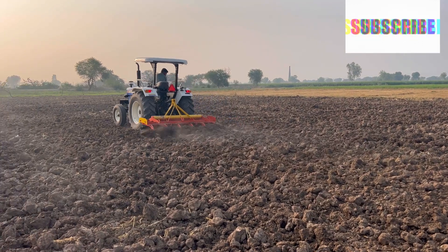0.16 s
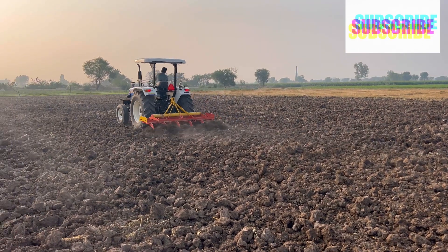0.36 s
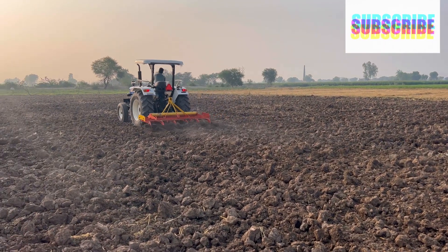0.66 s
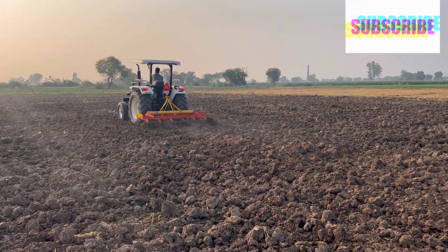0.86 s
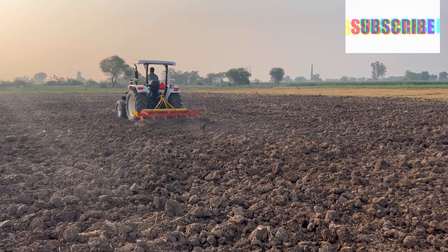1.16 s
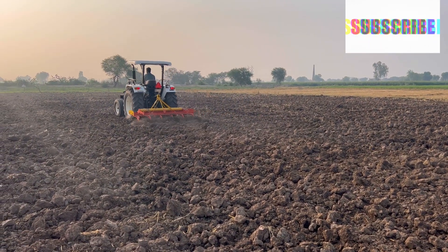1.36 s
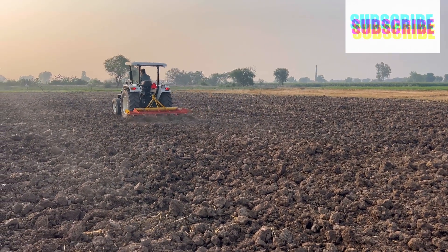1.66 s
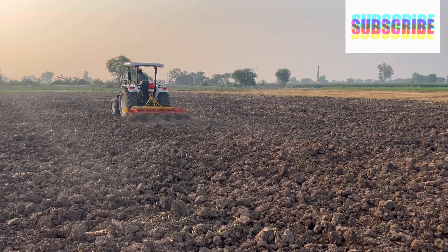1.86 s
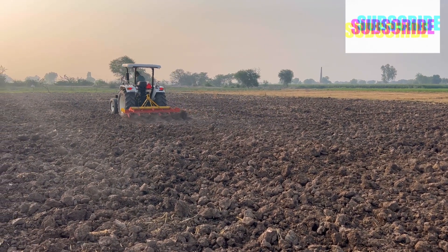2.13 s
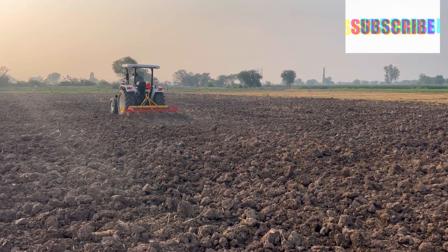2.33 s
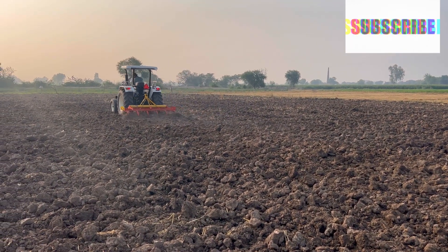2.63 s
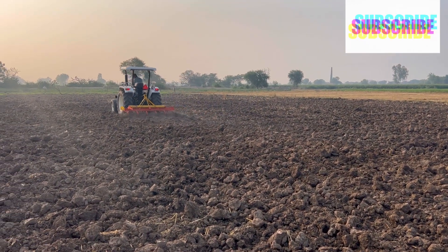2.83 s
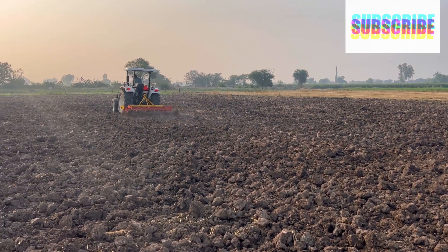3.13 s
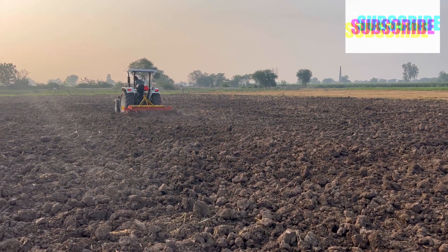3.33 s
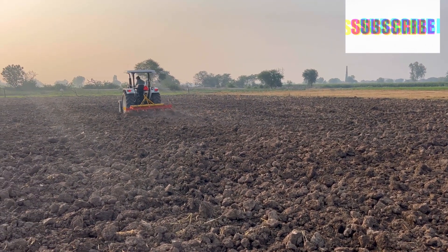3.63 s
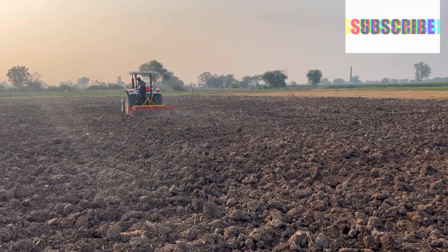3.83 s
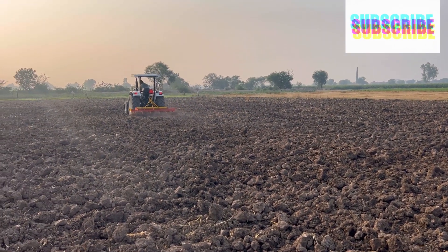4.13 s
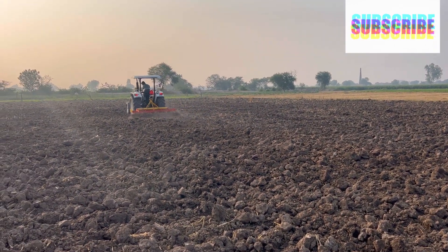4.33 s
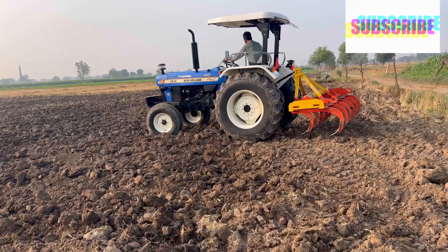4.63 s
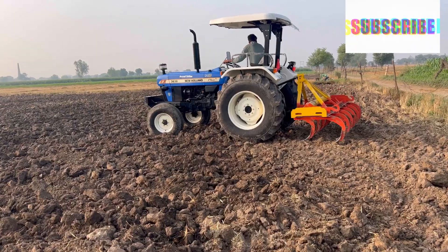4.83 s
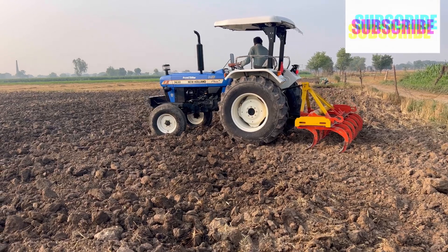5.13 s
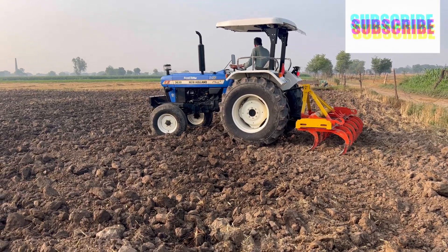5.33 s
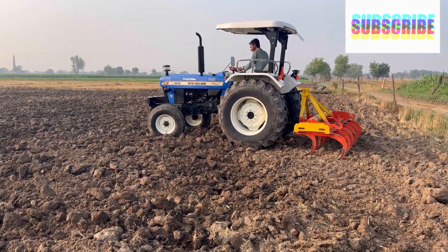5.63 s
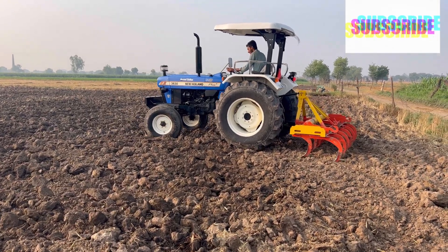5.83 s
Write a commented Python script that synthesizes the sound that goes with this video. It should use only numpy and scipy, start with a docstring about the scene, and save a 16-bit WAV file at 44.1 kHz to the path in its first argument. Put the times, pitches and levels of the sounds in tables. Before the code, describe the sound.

Far-off tractor engine hums and rattles over a ploughed field, slowly fading, before a sudden cut to a near, fast-beating diesel that bogs down.

```python
"""A three-cylinder diesel tractor drags a harrow over an open ploughed field: far off and driving away,
then from close by as the load pulls its speed down. Sine orders of the firing rate make its exhaust and
whine; shaped noise, pulsed by the firings, makes the roar of the block and the clatter of tines.
Tines strike stones as decaying rings and grit; gliding tones make a linkage squeak and a bird chirp;
low noise buffets as wind. Two microphone ports hear it all."""
import sys
import numpy as np
from scipy import signal
from scipy.fft import rfft, irfft, next_fast_len
from scipy.io import wavfile
from scipy.ndimage import uniform_filter1d

SR = 44100
rng = np.random.default_rng(int(sys.argv[2]) if len(sys.argv) > 2 else 0)


def to_wav(sig):
    """Store sig (one row per channel, or 1-D mono) as 16-bit WAV at the path in sys.argv[1].

    Samples outside -1..1 are clipped; the rate is SR.
    """
    pcm = np.clip(np.atleast_2d(sig), -1, 1) * 32767
    pcm = np.round(pcm).astype(np.int16)
    wavfile.write(sys.argv[1], SR, pcm.T)  # frames by channels


N = 263718

# the two microphone ports, as they hear the far tractor and the bird:
# (frequency [Hz], left over right [dB], likeness [0-1], left leads [rad])
FAR_PORTS = [(38, 2, 0.8, 0.02), (75, 0, 0.93, 0.065), (190, -0.5, 0.99, 0.091), (300, 1.5, 1, 0.18),
             (506, 0, 0.96, 0.56), (1280, 7, 0.84, 0.99), (1414, -2, 0.4, 2.1), (1694, 15.5, 1, 1.63),
             (2210, -15, 0.32, 2.4), (2500, 4, 0.83, 1.9), (2840, 1, 0.73, 0.89), (3670, -4, 0.81, 3),
             (4650, -2, 0.84, 1.96), (5020, 4.5, 0.22, 5.3), (5760, 6.5, 1, 3.8), (7400, 7.5, 0.2, 6),
             (9400, 11.5, 0.6, 2.5)]
FLYWHEEL_S = 0.087  # speed changes are rounded over this time


def far_tractor(t):
    """Steady low exhaust orders and a whine over a thin roar, sinking as it drives away."""
    # engine speed as the tines bite and let go: (time [s], firing rate [firings per s])
    run = [(0.0, 37.7), (0.12, 37.5), (0.3, 35.7), (0.6, 38.0), (0.7, 37.3), (0.86, 37.3), (1.02, 36.5),
           (1.2, 38.0), (1.67, 38.3), (1.93, 35.9), (2.14, 37.0), (2.36, 35.9), (2.62, 37.3), (2.81, 39.85),
           (2.95, 39.75), (3.1, 38.1), (3.2, 40.3), (3.31, 40.5), (3.48, 35.0), (3.71, 36.7), (3.98, 37.85),
           (4.2, 38.0), (4.42, 36.4)]
    # (multiple of the firing rate, level against the exhaust [dB], wander [dB], extra fade [dB per s])
    orders = [(1, -11, .7, 0), (2, 1, .5, 0), (3, -11, 1, .3), (4, -18, 1, 2), (5, -24.5, 1, 0),
              (6, -29, 2, .5), (7, -22, 1, .3), (8, -28, 1.5, 0), (9, -18.5, 2, 1), (10, -24.5, 1.5, 0),
              (11, -23, 1.5, 1), (12, -23, 1, 0), (15, -26, 1.5, .5), (27, -30, 2.5, 0), (28, -26, 3, 0),
              (29, -27, 3, 0), (30, -28, 3, 0)]
    # the whine comes and goes: (time [s], level before resonance and wander [dB])
    whine = [(0, -39.5), (.25, -41), (.33, -48), (.6, -48), (.68, -40), (.8, -41), (.88, -50), (1.15, -47),
             (1.25, -41), (1.7, -41), (1.8, -48), (1.95, -40.5), (2.05, -40), (2.13, -53), (2.26, -52),
             (2.33, -43), (2.58, -43), (2.66, -56), (2.79, -41), (2.94, -40), (3, -58), (3.15, -56),
             (3.21, -45.5), (3.3, -46), (3.35, -56), (3.45, -43), (3.6, -43), (3.75, -47), (4, -43),
             (4.27, -43), (4.36, -52)]
    # colour of the roar, engine block then tines: (frequency [Hz], relative density [dB per Hz])
    block = [(24, -40), (31, -29.5), (44, -20), (60, -25.5), (85, -15), (100, -18.5), (130, -20),
             (170, -19), (300, -8.5), (506, -8), (560, -10), (610, -18), (670, -19.5), (1073, -8),
             (1800, -21)]
    clatter = [(1900, -26), (2400, -17), (3100, -22), (3700, -20.5), (4000, -27), (6200, -31), (6500, -36),
               (8300, -39.5), (9400, -49.5), (11600, -47), (13900, -44.5), (15100, -58), (15200, -91)]
    # echoes dent and lift the treble: (centre [Hz], width [Hz], left change [dB], right change [dB])
    echoes = [(1546, 66, 4.5, 0), (1760, 83, 1, 10.5), (3250, 200, -10.5, -0.5), (4260, 250, 4, -1.5),
              (4740, 190, -5, 2), (5360, 150, 0, -2), (5516, 170, 1.5, 2.5), (6630, 180, -5.5, 1),
              (6900, 200, 2, -2), (7606, 270, -3.5, -9.5), (8460, 250, 0, 8)]
    # bands that swell or sink as the tractor turns its side:
    # (centre [Hz], width [Hz], change from middle to end [dB])
    turning = [(1500, 250, 3.5), (2200, 300, -1.5), (3600, 400, 1)]
    governor_s = 0.057  # fuel answers a speed change late
    exhaust_db, exhaust_fade_db_per_s = -25.5, 1.0  # level at the start
    roar_db, roar_fade_db_per_s = -30, 1.71  # level at the start
    load_db_per_hz = 0.1  # the exhaust barks louder when the speed has sagged
    # weakening of upper orders while the speed glides, scaled by order / 14; the whine is left out
    smear_db_per_hz_s = 0.06

    firing_hz = uniform_filter1d(play(run, t)[0], round(FLYWHEEL_S * SR))
    turns = np.cumsum(firing_hz) / SR  # one turn is one firing
    sag_hz = firing_hz[0] - np.interp(t - governor_s, t, firing_hz)
    db = exhaust_db - exhaust_fade_db_per_s * t + load_db_per_hz * sag_hz + .5 * drift(t, 8)

    # the fourteenth order whines and swells at the pipe resonance
    whine_hz, below_hz = 14 * firing_hz, 13 * firing_hz
    whine_db = play(whine, t)[0] + 1.6 * drift(t, 25)
    pipe_db = resonance(whine_hz, centre_hz=561, width_hz=16, lift_db=7)
    out = tone(14 * turns, whine_hz, whine_db + pipe_db, FAR_PORTS)
    # the order below is weaker and joins near a lower resonance
    below_db = -11 + resonance(below_hz, centre_hz=496, width_hz=12, lift_db=9.5)
    out = out + tone(13 * turns, below_hz, whine_db + below_db + drift(t, 8), FAR_PORTS)

    glide_hz_per_s = uniform_filter1d(np.gradient(firing_hz, t), round(FLYWHEEL_S * SR))
    for k, level_db, wander_db, fade_db_per_s in orders:
        k = round(k)
        # the lowest order swings against the next two
        phase_turns = .5 * (k == 1) if k < 4 else rng.random()
        smear_db = k / 14 * smear_db_per_hz_s * abs(glide_hz_per_s) * (k > 4)
        order_db = db + level_db - fade_db_per_s * t + wander_db * drift(t, 9) - smear_db
        out = out + tone(k * turns + phase_turns, k * firing_hz, order_db, FAR_PORTS)

    noise = roar(t, turns, block + clatter, FAR_PORTS, echoes, turning, stretch=0.049,
                 low_mid_rise_db=0.5, sway=0.15, patchy_db=1.0, throb_db=2.0, rattle_db=5.5, count=2)
    return out + amp(roar_db - roar_fade_db_per_s * t) * noise


def near_tractor(t):
    """Sharp exhaust beats, cylinder orders and body rings over a loud roar, as load drags the speed."""
    # (time [s], firing rate [firings per s])
    run = [(4.42, 63.7), (5.1, 63.42), (5.38, 63.3), (5.57, 62.9), (5.66, 61.5), (5.76, 59.7), (5.98, 51.5)]
    # the first three firing orders: (level running free [dB], change under full load [dB], wander [dB])
    exhaust = [(-25.5, 7, .8), (-29, 8, 1.2), (-26, -9, .8)]
    # weaker orders; thirds are the unevenness between cylinders:
    # (thirds of the firing rate, level before sag and resonance [dB])
    orders = [(4, -39), (8, -38), (10, -44), (11, -39.5), (12, -42), (13, -43), (14, -44), (15, -43),
              (18, -38), (20, -47), (21, -37), (22, -47), (25, -49), (27, -43), (30, -50), (32, -48),
              (33, -43), (34, -43), (36, -45), (38, -47), (39, -43.5), (40, -37.5), (42, -36.5), (44, -48),
              (46, -45), (47, -48), (48, -37.5), (49, -45), (51, -48), (52, -48), (53, -42), (54, -38.5),
              (56, -49), (57, -49)]
    # body resonances that stay put while the speed sags: (frequency [Hz], width [Hz], level before sag [dB])
    body = [(724, 14, -41), (1720, 6, -44.5), (1970, 10, -47), (2578, 6, -45)]
    # colour of the roar, engine block then tines: (frequency [Hz], relative density [dB per Hz])
    block = [(25, -28.5), (27, -17), (62, -12), (150, -8), (219, -8), (306, -4), (428, -7), (506, -14.5),
             (550, -8.5), (650, -14), (720, -7), (780, -8.5), (870, -10.5), (1167, -9), (1269, -15.5),
             (1600, -14), (1800, -14.5)]
    clatter = [(1900, -12), (2200, -19), (2600, -11.5), (3200, -17.5), (4700, -16), (5300, -20),
               (5600, -21), (7100, -28), (7900, -28.5), (8100, -25.5), (9000, -31), (11800, -30.5),
               (15000, -33), (15400, -29.5)]
    # the ports close by: (frequency [Hz], left over right [dB], likeness [0-1], left leads [rad])
    ports = [(60, -0.5, 1, -0.02), (120, 0, 1, -0.38), (190, 0, 1, 0), (303, -0.8, 1, 0.0),
             (403, -2.5, 0.95, 0.5), (502, -4, 0.9, 0.2), (635, 11, 0.1, 3), (705.5, 1, 1, -0.5),
             (1100, 3.5, 1, 1.18), (1300, -2, 0, -2.5), (1410, 7, 0, 3), (1524, 5, 1, 4),
             (3816, -5, 0.6, 8.5), (7000, 10.5, 0.12, 9.5), (7200, 7, 0.32, 10.5), (8400, 2, 0.4, 14),
             (8600, 9, 0, 24), (9500, -4, 0.16, 12)]
    # echoes dent and lift the treble: (centre [Hz], width [Hz], left change [dB], right change [dB])
    echoes = [(1540, 150, 0, -1.5), (3006, 230, 0, 1.5), (3210, 140, -2, -4.5), (3730, 135, 7, 2),
              (4100, 180, -6, -4.5), (5340, 168, -12, -1), (6470, 330, -1, 3.5), (7200, 180, -2, -6),
              (9000, 150, -4, -1)]
    # bands that swell or sink as the tractor turns its side:
    # (centre [Hz], width [Hz], change from middle to end [dB])
    turning = [(1500, 300, 3), (2070, 150, -2.5), (3750, 250, -1.5)]
    full_load_sag_hz = 4.5
    load_lag_turns = .39  # under load each order lags the one below, so the beats round off
    roar_db, roar_sag_db_per_hz = -23.5, 0.15

    firing_hz = uniform_filter1d(play(run, t)[0], round(FLYWHEEL_S * SR))
    turns = np.cumsum(firing_hz) / SR
    sag_hz = firing_hz[0] - firing_hz
    load = np.tanh((sag_hz / full_load_sag_hz) ** 2)

    out = 0
    for k, (free_db, load_db, wander_db) in enumerate(exhaust, 1):
        lag_turns = (k - 1) * load_lag_turns * load
        order_db = free_db + load_db * load + wander_db * drift(t, 14)
        out = out + tone(k * turns - lag_turns, k * firing_hz, order_db, ports)

    sag_db = -0.4 * sag_hz  # weaker orders sink further as the speed falls
    for thirds, level_db in orders:
        order_hz = thirds / 3 * firing_hz
        # a panel resonance lifts whichever order passes it
        hood_db = resonance(order_hz, centre_hz=298, width_hz=11, lift_db=12 - sag_db)
        order_db = level_db + sag_db + hood_db + 1.4 * drift(t, 9.1)
        out = out + tone(thirds / 3 * turns + rng.random(), order_hz, order_db, ports)

    for hz, width_hz, level_db in body:  # a narrow ring: pitch and level both waver
        ring_turns = np.cumsum(hz + width_hz / 2 * drift(t, 14)) / SR
        ring_db = level_db - 3 * abs(sag_hz / 7) ** 3 + 1.8 * drift(t, 8)
        out = out + tone(ring_turns, hz, ring_db, ports)

    noise = roar(t, turns, block + clatter, ports, echoes, turning, stretch=0.0021,
                 low_mid_rise_db=2.5, sway=0.45, patchy_db=1.3, throb_db=1.0, rattle_db=1.0, count=1)
    return out + amp(roar_db - roar_sag_db_per_hz * sag_hz) * noise


def roar(t, turns, colour, ports, echoes, turning, stretch, low_mid_rise_db, sway, patchy_db,
         throb_db, rattle_db, count):
    """Noise of block and tines, puffed by each firing, the treble broken into rattles."""
    # top treble: left and right opposed, then alike: (frequency [Hz], signed likeness [-1 to 1])
    top_likeness = [(9400, -.6), (9900, -1), (10900, -1), (11400, -.75), (12300, .7), (12650, 1),
                    (14300, 1), (14800, .3), (15400, -.8)]
    frames, hz = len(t) // 512 + 5, np.fft.rfftfreq(2048, 1 / SR)[:, None]
    a, b, c, d, patches, air = rng.standard_normal((frames, 1025, 6), dtype=np.float32).T
    travel = np.linspace(-1, 1, frames)
    below_top = hz < top_likeness[0][0]

    # ground echo and port colour slide upward as the bearing changes
    seen_hz = hz / (1 + stretch * travel * np.clip(hz / 1500 - .5, 0, 1) * below_top)
    over_db, like, lead = read(ports, seen_hz)
    air = evened(uniform_filter1d(uniform_filter1d(air, 20, 0), 30, 1))
    lead = lead + sway * air * np.clip(hz / 2000, 0, 1)  # moving air shifts the path to each port
    same_below = np.clip(like, 0, .999) ** 0.82 * np.exp(-1j * lead)
    same = np.where(below_top, same_below, read(top_likeness, seen_hz)[0])

    half_db = over_db * below_top / 2
    sides_db = np.array([half_db, -half_db])
    for centre_hz, width_hz, *change_db in echoes:
        dent = np.exp(-((seen_hz - centre_hz) / width_hz) ** 2)
        sides_db = sides_db + np.reshape(change_db, (2, 1, 1)) * dent
    for centre_hz, width_hz, change_db in turning:
        sides_db = sides_db + travel * resonance(hz, centre_hz, width_hz, change_db)

    # the right side shares part of the left side's noise
    left = a + 1j * b
    right = same * left + np.sqrt(1 - abs(same) ** 2) * (c + 1j * d)
    spectrum = np.array([left, right])
    patches = evened(uniform_filter1d(uniform_filter1d(patches, 20, 0), 6, 1))
    # the low mids around 220 Hz climb steadily
    low_mid_db = low_mid_rise_db * travel * np.exp(-np.log(hz / 220 + 1e-9) ** 2)
    spectrum *= amp(read(colour, seen_hz)[0] + sides_db + patchy_db * patches + low_mid_db)

    bass = np.clip(2 - hz / 150, 0, 1)
    high = np.clip(np.log2(hz / 2500 + 1e-9) / 2, 0, 1)
    low, mid, top = (signal.istft(spectrum * share, nperseg=2048, noverlap=1536)[1][:, :len(t)]
                     for share in (bass, 1 - bass - high, high))

    strength = rng.uniform(0.86, 0.92, int(turns[-1]) + 1)[turns.astype(int)]
    puff = uniform_filter1d(strength * np.exp(-(turns % 1) / 0.21), 40)  # sudden at each firing, then dying
    hits = rng.uniform(.1, 0.95, len(t)) * (rng.random(len(t)) < 170 / SR)  # about 170 a second
    ringing = signal.lfilter([1], [1, -np.exp(-1 / (0.0033 * SR))], hits)  # each dies over 3.3 ms
    rattle = uniform_filter1d(ringing, 90)
    flutter = uniform_filter1d(np.exp(-(count * turns % 1) / 0.3), 80)  # block knocks count times a firing
    gate, burst = amp(throb_db * flutter), amp(rattle_db * (rattle + puff))
    return evened(low + mid * gate / np.mean(gate) + top * burst / np.mean(burst))


def tone(turns, hz, db, ports):
    """One sine as the two ports hear it, its level and phase split by the port table."""
    over_db, _, lead = read(ports, np.mean(hz))
    half = np.array([[.5], [-.5]])
    spin = np.sqrt(2) * amp(db) * np.exp(2j * np.pi * turns)
    return (amp(half * over_db) * np.exp(1j * half * lead) * spin).real


def resonance(hz, centre_hz, width_hz, lift_db):
    """Level change in dB of a bell-shaped resonance."""
    return lift_db * np.exp(-((hz - centre_hz) / width_hz) ** 2)


def knocks():
    """Tines strike stones: each blow rings briefly at its brightness, with a burst of grit around it."""
    # one blow scatters into several:
    # (time [s], level before decay [dB], brightness [Hz], spread each way [octaves], 60 dB decay [s])
    blows = [(.449, -39.5, 4500, 0.27, 0.039), (1.267, -42, 5000, 0.23, 0.041),
             (2.61, -41.5, 4480, 0.24, .04), (2.741, -50, 8200, .03, 0.057), (2.749, -45, 5100, .15, .2),
             (2.751, -43, 4000, .15, .08), (2.751, -35, 2800, .25, .12), (2.751, -50, 7400, .25, .1),
             (2.753, -24.5, 1020, .3, .09), (3.4595, -19, 1050, 0.23, 0.028), (3.878, -43, 4050, 0.23, .03)]
    rise_s = .0035
    out, t = np.zeros((2, N)), np.arange(8000) / SR
    for s, db, hz, spread, t60 in blows:
        band = signal.butter(3, [hz / 2 ** spread, hz * 2 ** spread], "band", fs=SR, output="sos")
        dull = signal.butter(1, hz, fs=SR, output="sos")  # grit thins out above the brightness
        rough = rng.standard_normal(len(t)) * amp(2.4 * drift(t, 213))
        grit = evened(signal.sosfilt(np.vstack([band, dull]), rough))
        ring = np.clip(1.1 - hz / 6000, 0, 1) * (spread < 1)  # bright blows are mostly grit
        blow = ring * np.sin(2 * np.pi * hz * t) + (1 - 0.75 * ring) * grit
        start = round(s * SR)
        out[:, start:start + len(t)] += amp(db - 60 * t / t60) * blow * np.minimum(t / rise_s, 1)
    return out


def linkage_squeaks():
    """Short rough squeaks, likely the harrow linkage, as gliding tones of uneven level."""
    # (time [s], length [s], start [Hz], end [Hz], level before flutter [dB])
    squeaks = [(4.615, .08, 5600, 5580, -46.5), (4.703, .035, 5580, 5400, -45.5),
               (4.735, .02, 5200, 5120, -45), (4.785, .045, 5550, 5750, -46.5),
               (4.842, .045, 5620, 5660, -44), (4.872, .025, 5000, 4950, -44),
               (4.895, .03, 5600, 5550, -46), (4.88, .22, 8080, 8100, -49.5)]
    # (frequency [Hz], left over right [dB], likeness [0-1], left leads [rad])
    ports = [(5000, 7, 1, 0.58), (8500, 1, 1, .5)]
    return whistles(squeaks, ports, waver_hz=100, rough_db=5.0)


def bird():
    """Thin gliding whistles, likely a bird."""
    # (time [s], length [s], start [Hz], end [Hz], level [dB])
    chirps = [(2.035, .03, 5300, 6200, -57), (2.06, 0.055, 6270, 5950, -51), (2.095, 0.07, 4950, 5250, -58),
              (2.232, .03, 5300, 6300, -56), (2.253, 0.052, 6310, 6130, -48), (2.435, .03, 5700, 6400, -57),
              (2.458, 0.03, 6376, 6100, -54)]
    return whistles(chirps, FAR_PORTS, waver_hz=45, rough_db=0.0)


def whistles(calls, ports, waver_hz, rough_db):
    """Short gliding tones with an unsteady pitch and, if rough, a fluttering level."""
    out = np.zeros((2, N))
    for s, length, start_hz, end_hz, db in calls:
        glide_hz = np.linspace(start_hz, end_hz, round(length * SR))
        t = np.arange(len(glide_hz)) / SR
        hz = glide_hz + waver_hz * drift(t, 158)
        call = tone(np.cumsum(hz) / SR, hz, db + rough_db * drift(t, 200), ports)
        start = round(s * SR)
        out[:, start:start + len(hz)] += call * signal.windows.tukey(len(hz), .6)
    return out


def wind(t):
    """Wind on the microphone: lumpy low noise, unrelated in the two ports."""
    # gusts: (time [s], level before lumps and port balance [dB])
    gusts = [(0.0, -50), (0.16, -38), (0.32, -49), (0.4, -40), (0.64, -47), (0.84, -40), (0.92, -49),
             (1.0, -37), (1.2, -49), (1.24, -39), (1.4, -47), (1.64, -40), (1.68, -33), (1.84, -45),
             (1.92, -39), (1.96, -48), (2.28, -34), (2.56, -45), (2.96, -36), (3.04, -43), (3.32, -47),
             (3.56, -35), (3.68, -44), (4.28, -40), (4.4, -49), (4.48, -36), (4.64, -35), (4.72, -26),
             (4.8, -32), (4.84, -27), (4.88, -30), (4.96, -29), (5.0, -25), (5.08, -32), (5.16, -28),
             (5.2, -36), (5.32, -41), (5.4, -35), (5.6, -48), (5.96, -44)]
    # (frequency [Hz], relative density [dB per Hz])
    wind_colour = [(20, -42), (32, -20), (48, -4), (70, 0), (100, -4), (166, -16), (265, -30), (400, -50),
                   (900, -110)]
    size = next_fast_len(N)
    colour = amp(read(wind_colour, np.fft.rfftfreq(size, 1 / SR))[0])
    rumble = evened(irfft(rfft(rng.standard_normal((2, size))) * colour, size)[:, :N])
    lumps_db = 1.5 * np.array([drift(t, 25), drift(t, 25)])
    balance_db = [[1], [-1]]  # left a little stronger
    return amp(play(gusts, t)[0] + lumps_db + balance_db) * rumble


def drift(t, top_hz):
    """Slow wander of rms 1: eight sines of random phase, up to top_hz."""
    coarse = t[::96]
    waves = sum(np.sin(2 * np.pi * (f * coarse + rng.random()))
                for f in np.geomspace(top_hz / 10, top_hz, num=8))
    return np.interp(t, coarse, evened(waves))


def amp(db):
    """dB to gain."""
    return 10 ** (np.asarray(db) / 20)


def evened(x):
    """Scales to rms 1."""
    return x / np.sqrt(np.mean(x ** 2) + 1e-20)


def read(table, hz):
    """Columns of a table at hz, straight lines on a log-frequency axis."""
    f, *columns = np.transpose(table)
    return [np.interp(np.log(hz + 1), np.log(f + 1), c) for c in columns]


def play(table, t):
    """Columns of a curve at the times t."""
    s, *columns = np.transpose(table)
    return [np.interp(t, s, c) for c in columns]


def scene():
    """The far tractor, a quick fade, then the near one; small sounds and wind are added on top."""
    cut_s, fade_out_s, fade_in_s = 4.421, .003, .03  # change of listening place
    t, cut = np.arange(N) / SR, round(cut_s * SR)
    far = far_tractor(t[:cut]) * np.clip((cut_s - t[:cut]) / fade_out_s, 0, 1)
    near = near_tractor(t[cut:]) * np.clip((t[cut:] - cut_s) / fade_in_s, .15, 1)
    small = knocks() + linkage_squeaks() + bird()
    return np.hstack([far, near]) + small + wind(t)


def record(dry):
    """Bass cut of the microphone, then a steep low-pass as the band limit."""
    rumble_hz, edge_hz = 22, 15660
    bass_cut = signal.sosfilt(signal.butter(2, rumble_hz, "high", fs=SR, output="sos"), dry)
    band_limit = signal.firwin(1535, edge_hz, window=("kaiser", 10), fs=SR)
    return signal.oaconvolve(bass_cut, band_limit[None], "same")


dry = scene()
out = record(dry)
to_wav(out)
```